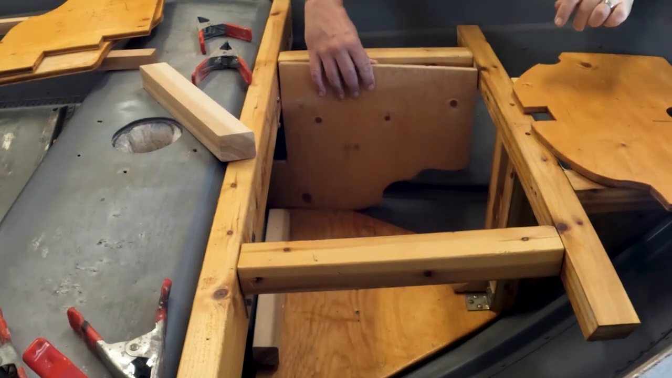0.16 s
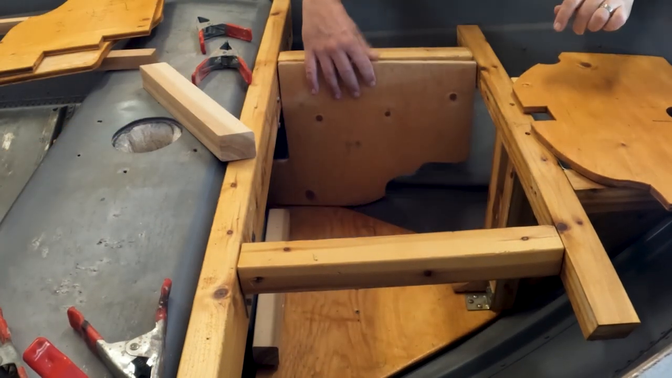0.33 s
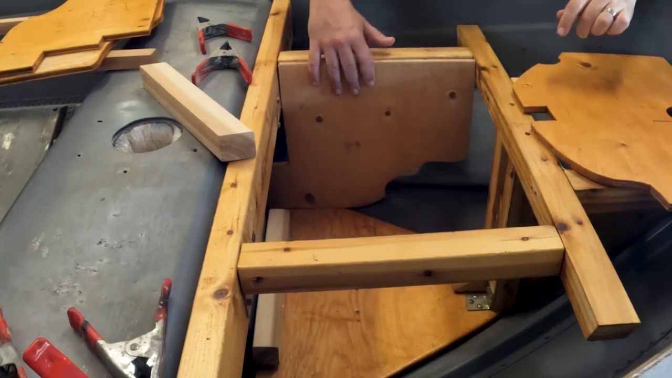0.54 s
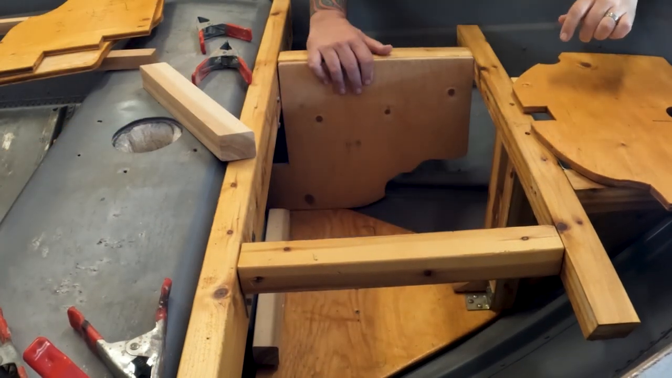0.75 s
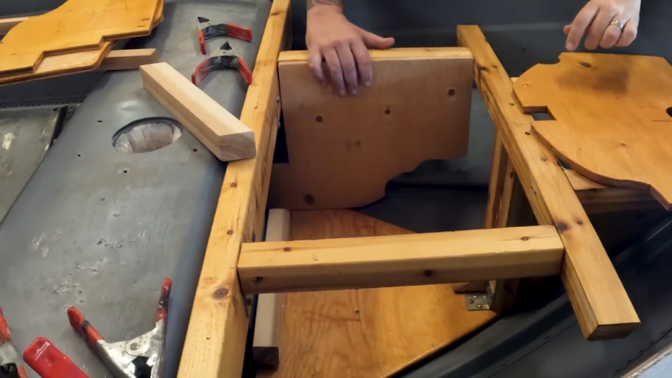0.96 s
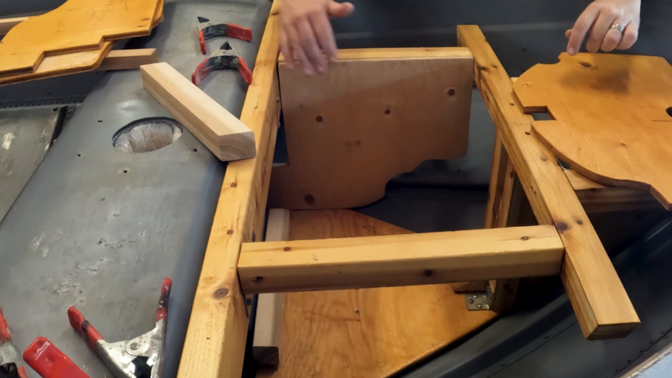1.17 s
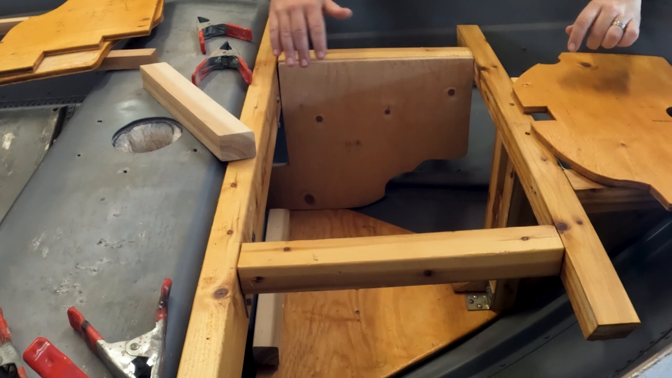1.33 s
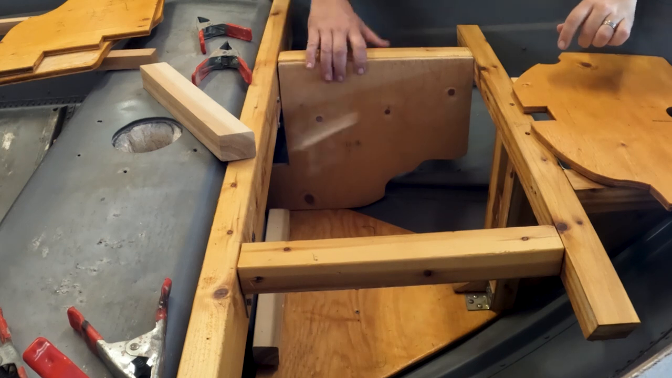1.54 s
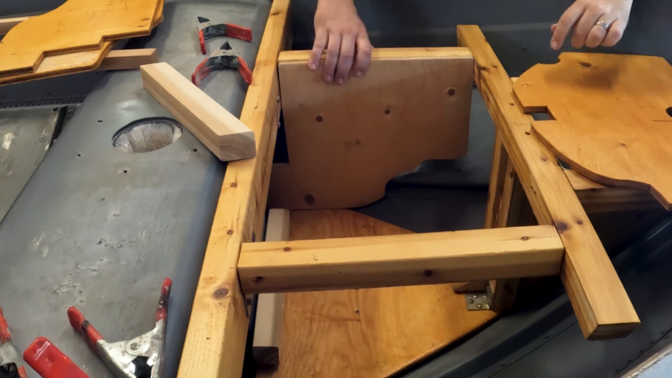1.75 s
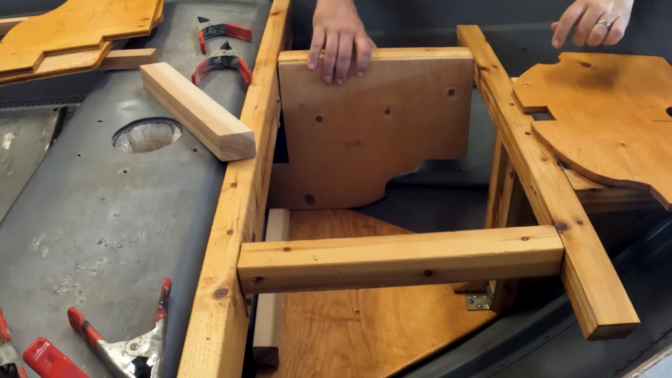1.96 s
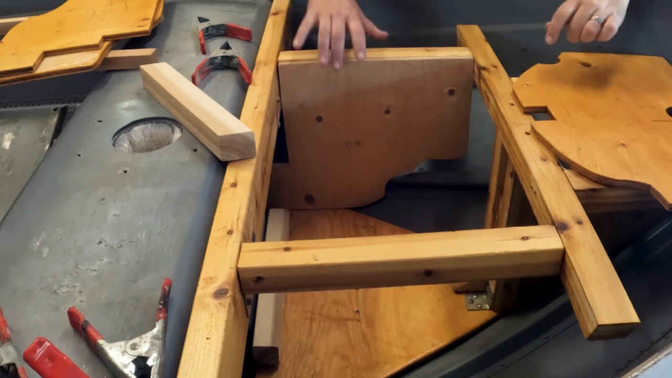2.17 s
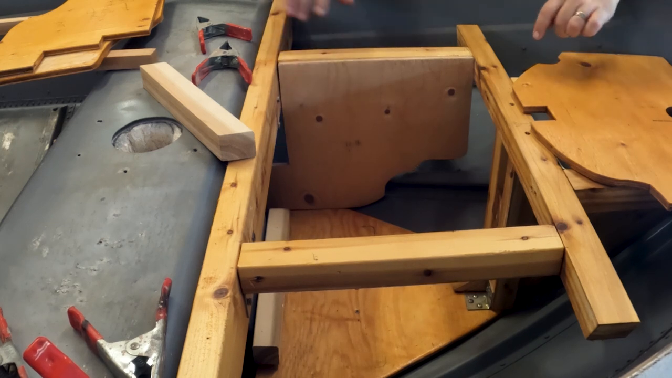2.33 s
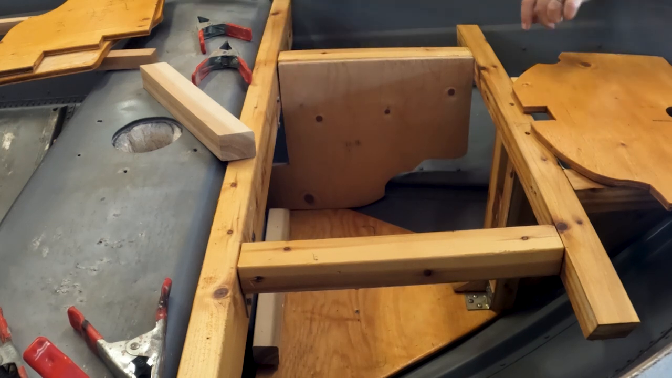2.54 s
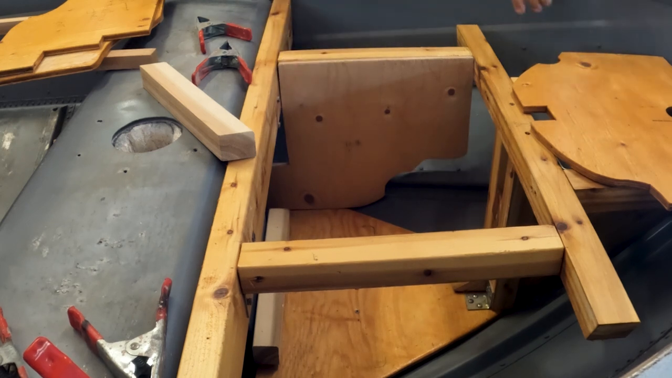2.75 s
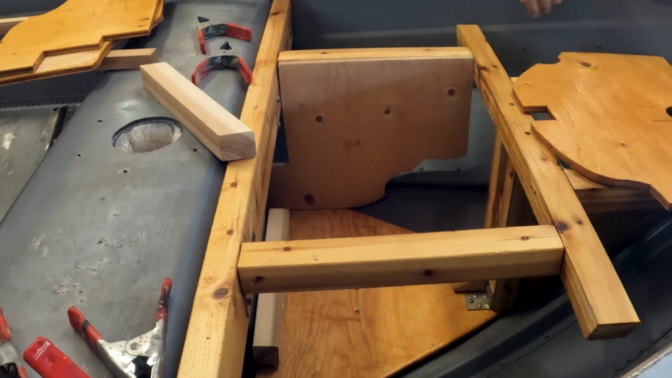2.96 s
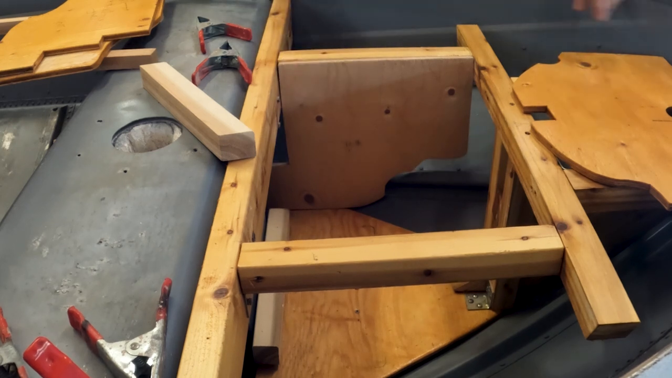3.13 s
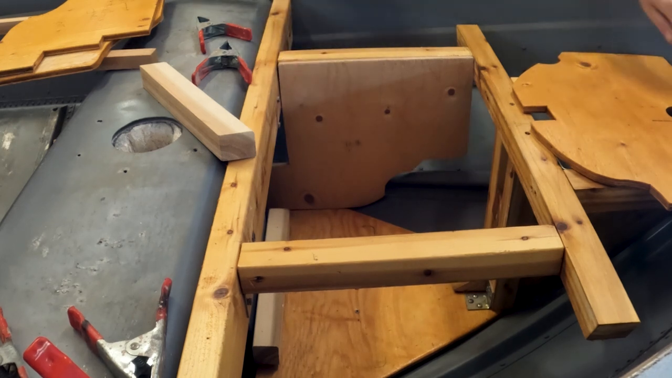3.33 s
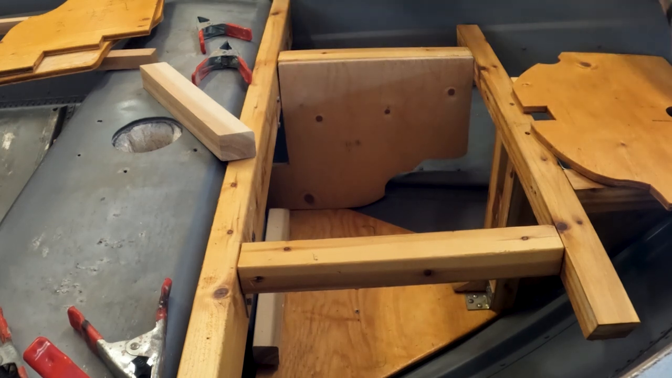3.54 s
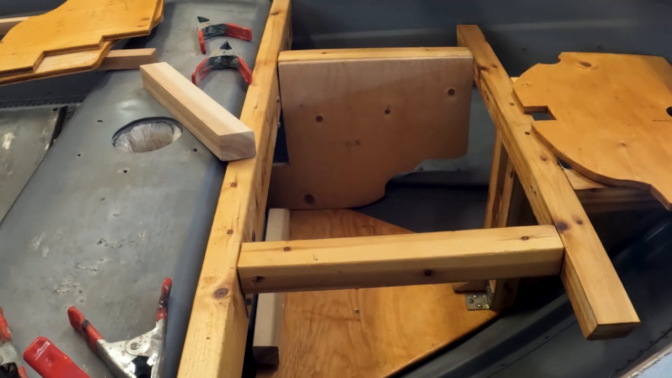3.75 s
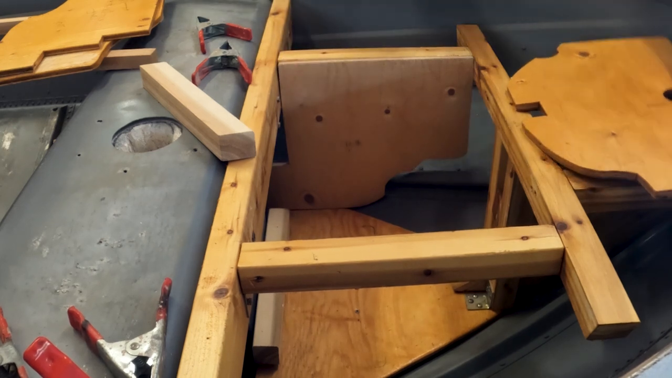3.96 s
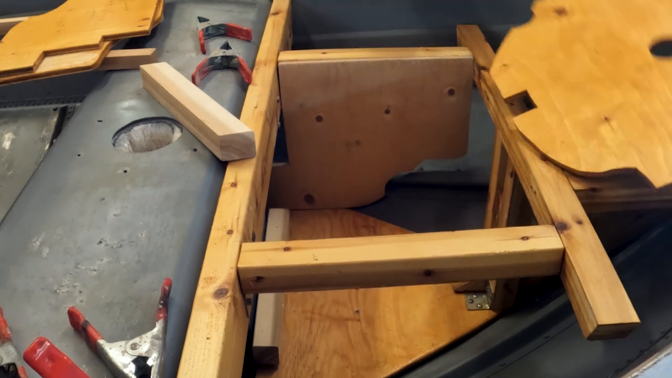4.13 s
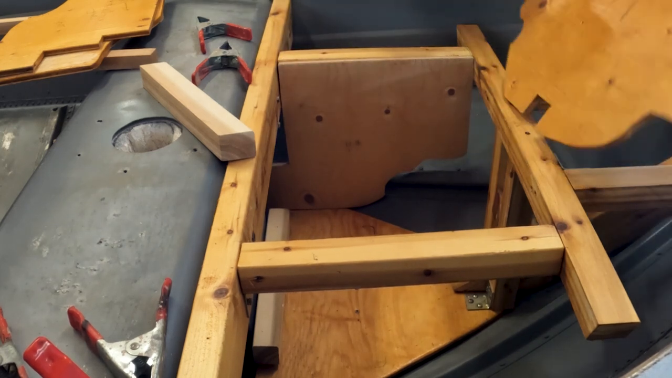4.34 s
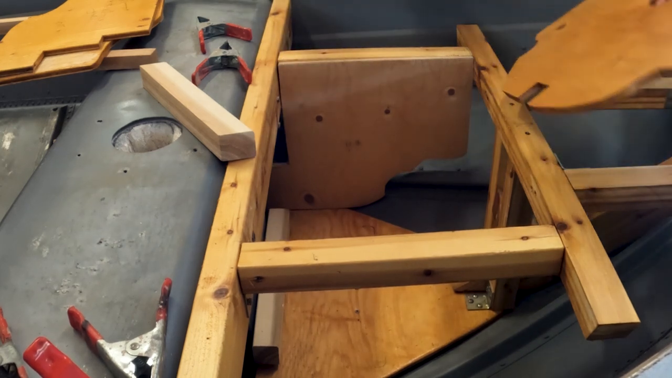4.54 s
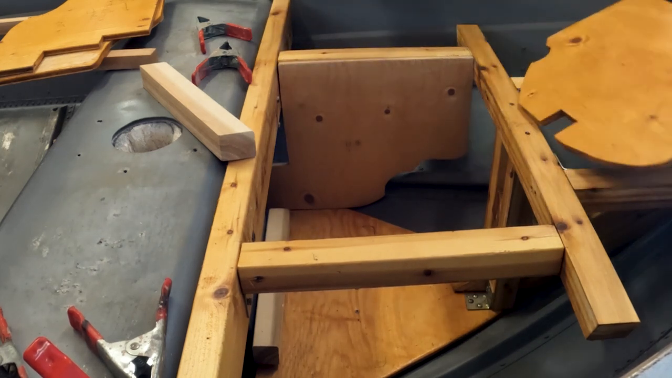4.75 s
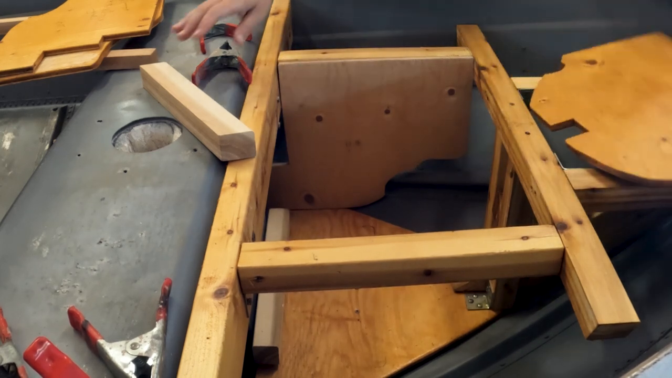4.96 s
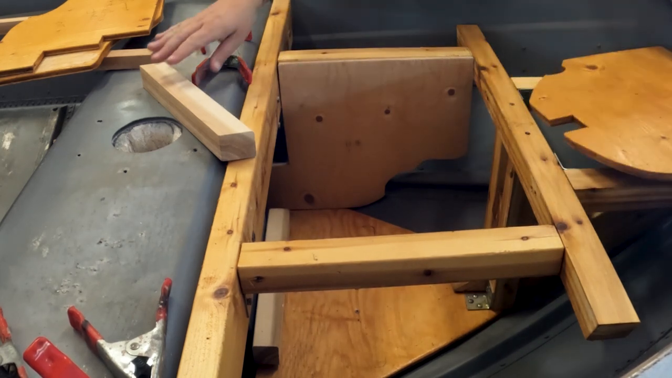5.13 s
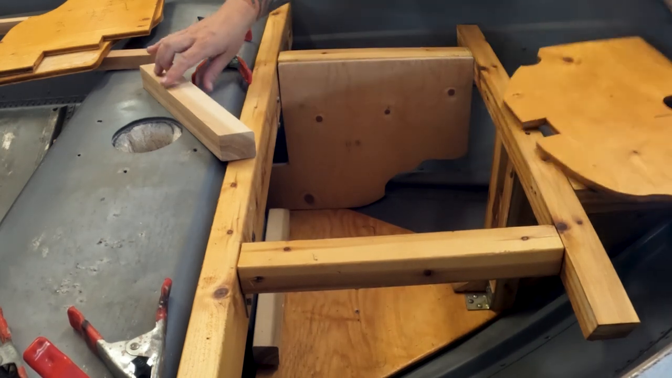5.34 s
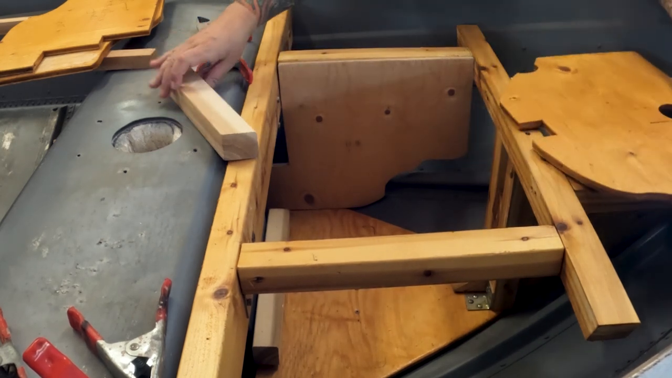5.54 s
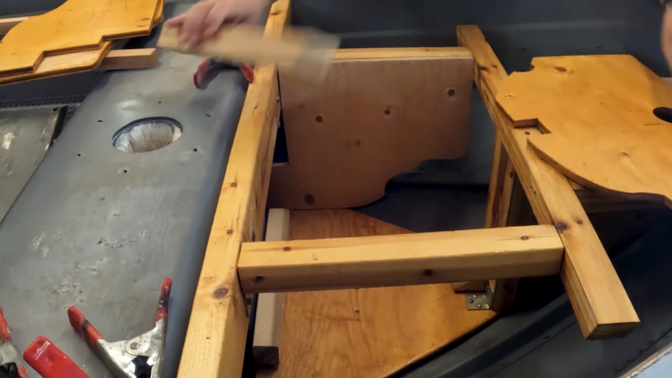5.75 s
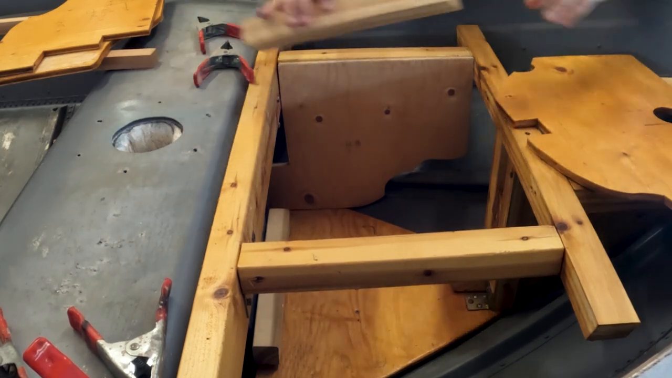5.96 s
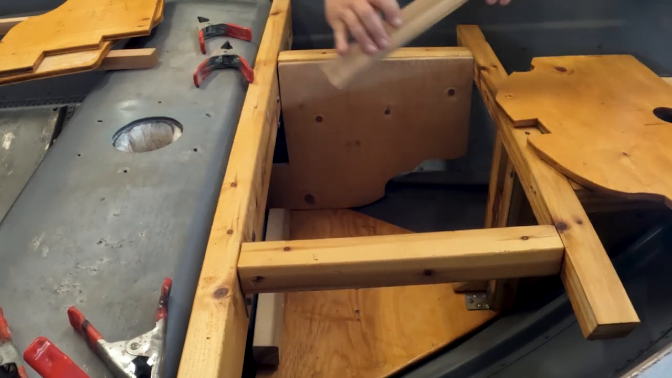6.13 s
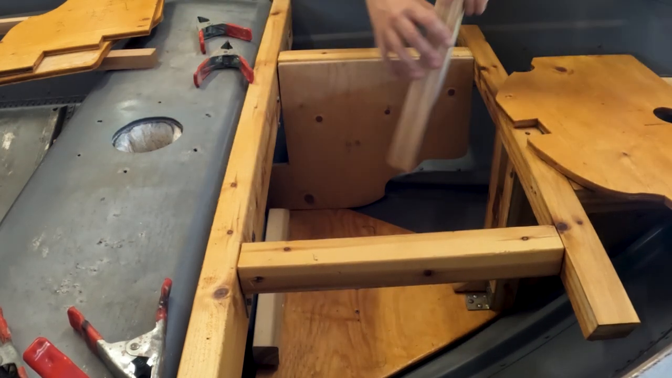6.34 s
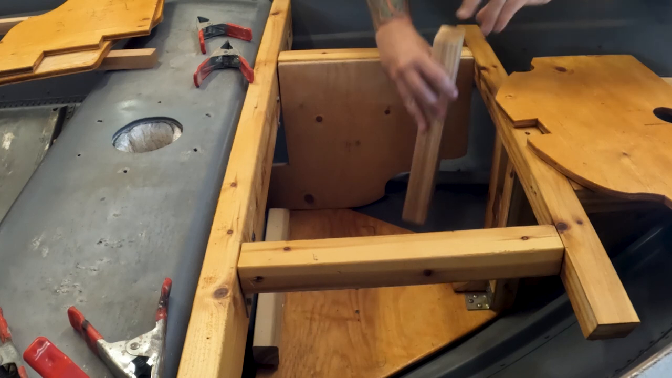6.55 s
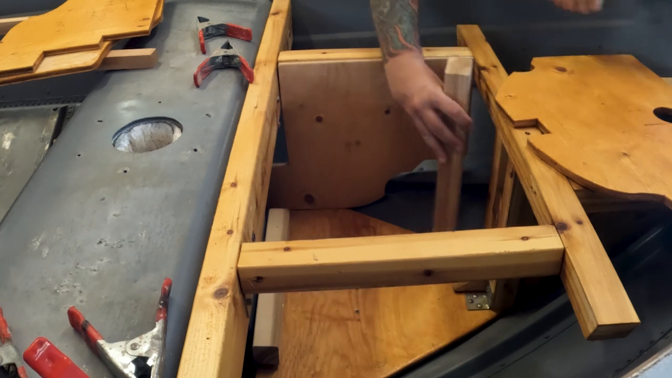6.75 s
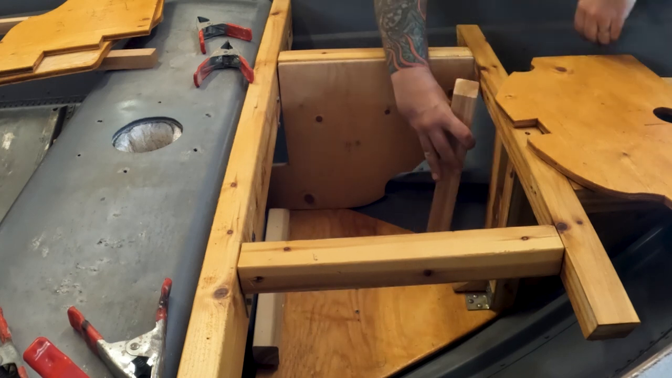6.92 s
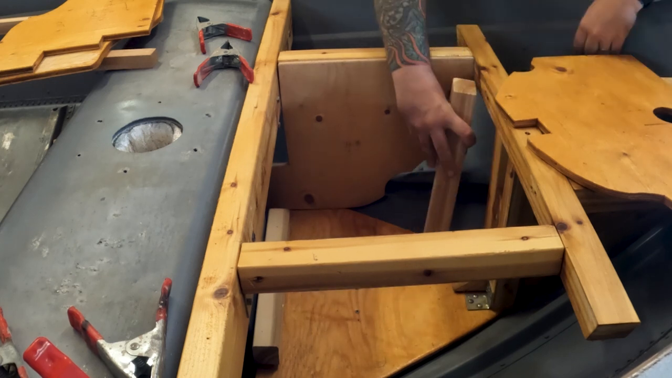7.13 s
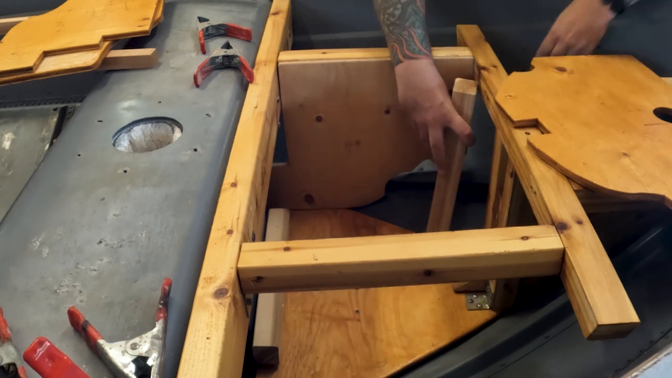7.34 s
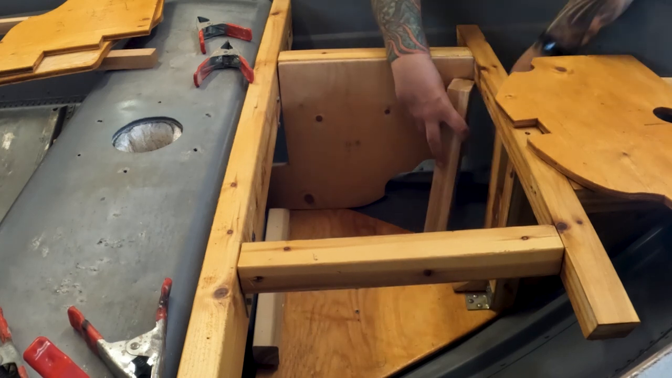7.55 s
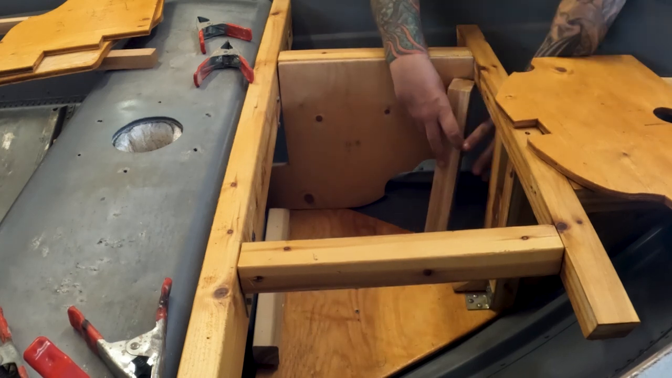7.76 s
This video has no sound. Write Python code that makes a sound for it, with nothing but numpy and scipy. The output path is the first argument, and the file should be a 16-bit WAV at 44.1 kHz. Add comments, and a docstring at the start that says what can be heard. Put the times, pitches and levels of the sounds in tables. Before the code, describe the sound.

Wooden panels knock, scrape and clatter as they are fitted in a boat hull, with low hollow thuds, a brief hum and soft workshop hiss.

```python
"""Fitting boards into a boat hull

A plywood bulkhead slides and is tapped home, a loose deck panel drags over a pine frame, clatters down and hums,
and a pine post is gripped, squeaks and is stood on the hull floor, all over a soft workshop hiss.
Blows and friction are shaped noise driving each board's own modes; hull and room carry the tail."""
import sys
import numpy as np
from scipy import signal
from scipy.fft import rfft, irfft
from scipy.io import wavfile

SR = 44100
rng = np.random.default_rng(int(sys.argv[2]) if len(sys.argv) > 2 else 0)


def wrap_up_sound(samples):
    """Save the sound to the file named by the first command line argument, as 16-bit audio."""
    columns = np.atleast_2d(samples).T
    # keep every value between -1 and 1, then stretch to whole-number steps
    tamed = np.clip(columns, -1, 1)
    steps = np.round(tamed * 32767).astype(np.int16)
    wavfile.write(sys.argv[1], SR, steps)


N = 347938


def undb(db):
    """Decibels to gain."""
    return 10 ** (np.asarray(db) / 20)


def rms(x):
    """Root mean square, kept above zero."""
    return np.sqrt(np.mean(x ** 2)) + 1e-12


def over_hz(hz, table):
    """Columns of a (Hz, ..) table, read on a log-frequency axis."""
    points_hz, *columns = np.transpose(table)
    log_hz = np.log(np.maximum(hz, 1))
    return [np.interp(log_hz, np.log(points_hz), column) for column in columns]


def over_time(table):
    """Columns of a (s, ..) table, one value a sample."""
    points_s, *columns = np.transpose(table)
    return [np.interp(np.arange(N) / SR, points_s, column) for column in columns]


def split(x, edges_hz):
    """Cut a sound into adjoining bands at the given frequencies."""
    bands = []
    for hz in edges_hz:
        low = signal.butter(5, hz, fs=SR, output="sos")
        high = signal.butter(5, hz, "high", fs=SR, output="sos")
        bands.append(signal.sosfilt(low, x))
        x = signal.sosfilt(high, x)
    return bands + [x]


def response(spectrum, modes=(), size=16384):
    """Causal impulse response of a smooth spectrum with resonances standing out of it."""
    hz = np.maximum(np.fft.rfftfreq(size, 1 / SR), 1)
    # folding the cepstrum makes the smooth part minimum-phase
    cepstrum = irfft(np.log(undb(over_hz(hz, spectrum)[0])))
    cepstrum[1:size // 2] *= 2
    cepstrum[size // 2 + 1:] = 0
    smooth = np.exp(rfft(cepstrum))
    peaks = 0
    for mode_hz, width_hz, db in modes:
        peaks = peaks + undb(db) / (1 + 1j * (hz ** 2 - mode_hz ** 2) / (hz * width_hz))
    return irfft(smooth * (1 + peaks))[:size // 2]


def workshop_air(low_cut_hz=110):
    """Steady workshop noise: a soft hiss with little bass; its level wavers by a few dB, dipping near 5.9 s and
    7.3 s."""
    # Spectrum of the hiss. Each row: frequency in Hz, relative density in dB per Hz.
    spectrum = [(24, -45.5), (40, -14), (114, -15), (181, 3.5), (267, -5.5), (350, 3.5), (446, -1),
                (504, 2), (1470, -3.5), (1830, -5), (2230, -4), (6990, -14.5), (8920, -29.5), (11100, -22),
                (13500, -58)]
    # Level of the hiss. Each row: time in seconds, rms level in dB.
    level = [(0, -53.5), (1.25, -57.5), (1.55, -51.5), (2.0, -56.5), (2.6, -54.5), (4.7, -53), (5.9, -58),
             (6.35, -57.5), (6.9, -56.5), (7.3, -59), (7.89, -56)]
    air = signal.fftconvolve(rng.standard_normal(N), response(spectrum))[:N]
    air = signal.lfilter(*signal.butter(2, low_cut_hz, "high", fs=SR), air)
    return air / rms(air) * undb(over_time(level)[0])


def wood(modes, top_db):
    """Response of one board: dense wood, its own modes, and a top octave set by how rough its edge is."""
    # Dense response of the wood. Each row: frequency in Hz, gain in dB.
    dense = [(35, -42), (60, -19.5), (110, -3), (180, 14), (400, 9.5), (700, -1), (1400, -10.5),
             (2600, -11), (4200, -13), (5600, -17), (7500, -30.5), (11000, -36.5), (13500, -69.5)]
    shelf = [(5000, 0), (10000, top_db)]  # Hz, dB
    spectrum = [(hz, db + over_hz(hz, shelf)[0]) for hz, db in dense]
    return response(spectrum, modes)


def dense_ring(t, rise_s=0.00027, build_s=0.012):
    """Countless overlapping modes die fast in the board; a longer tail builds up in hull and room."""
    # Decay. Each row: frequency in Hz, board t60 in s, hull and room t60 in s, tail in dB re the blow.
    decay = [(79, 0.022, 0.67, -11.5), (212, 0.21, 0.61, -11), (480, 0.15, 0.59, -10),
             (1220, 0.088, 0.72, -20), (3160, 0.032, 0.55, -20), (9000, 0.031, 0.43, -23.5)]
    edges_hz = 110 * 2 ** np.arange(7)
    centres_hz = np.append(edges_hz, 2 * edges_hz[-1]) / np.sqrt(2)
    noise = rng.standard_normal(len(t))
    ring = 0
    for hz, band in zip(centres_hz, split(noise, edges_hz)):
        board_t60, room_t60, tail_db = over_hz(hz, decay)
        board = undb(-60 * t / board_t60)
        room = undb(tail_db - 60 * t / room_t60) * (1 - np.exp(-t / build_s))
        ring = ring + band * np.hypot(board, room)
    return ring * (1 - np.exp(-t / rise_s))


def friction(strokes, rasp_db):
    """Gains of rumble, rasp and hiss: a stroke sets in, swells or eases, and stops; brightness trades rumble for hiss."""
    attack_s, release_s = 0.0094, 0.0084  # a hand gets a board moving, and lets it stop
    t, gains = np.arange(N) / SR, np.zeros((3, N))
    for start_s, length_s, db, bright_db, swell_db in strokes:
        before = np.maximum(start_s - t, 0) / attack_s
        after = np.maximum(t - start_s - length_s, 0) / release_s
        outside = before + after
        near = outside < 10
        progress = np.clip((t[near] - start_s) / length_s, 0, 1)
        effort = undb(db + swell_db * (progress - .5)) * np.exp(-outside[near])
        stroke = np.outer(undb([-bright_db, rasp_db, bright_db]), effort)
        gains[:, near] = np.hypot(gains[:, near], stroke)
    return gains


def slide(strokes, modes, rasp_db, slips_per_s, spread_db, patchy_db, top_db):
    """The grain of a sliding edge catches and slips in patches; each slip is a tiny blow into the same board."""
    # Edges between rumble, rasp and hiss, in Hz.
    edges_hz = [550, 1500]
    spot_s = .07
    slipping = rng.random(N) < slips_per_s / SR
    size = np.minimum(rng.exponential(size=N), 4)
    patches = np.interp(np.arange(N), np.linspace(0, N, 700), rng.uniform(-1, 1, 700))
    slips = slipping * undb(spread_db * size + patchy_db * patches) * rng.choice([-1, 1], N)
    drives = slips / rms(slips) * friction(strokes, rasp_db)
    first_s, last_s = strokes[0][0] - spot_s, strokes[-1][0] + strokes[-1][1] + spot_s
    t, hop = np.arange(SR // 2) / SR, int(spot_s * SR)
    board, out = wood(modes, top_db), np.zeros(N + SR)
    # the contact travels, so the dense modes it excites keep changing
    for start in range(max(int(first_s / spot_s), 0) * hop, min(int(last_s * SR), N), hop):
        ring = signal.fftconvolve(dense_ring(t), board)[:len(t)]
        for drive, band in zip(drives, split(ring, edges_hz)):
            rub = signal.fftconvolve(drive[start:start + hop], band / np.linalg.norm(band))
            out[start:start + len(rub)] += rub
    return out[:N]


def blow_levels(strength_db, hardness_db, thud_db, colour):
    """Thud, boom, knock, clack and tick of one blow, in dB; a harder contact lifts the treble most."""
    # Shares of the hardness that go to knock, clack and tick.
    share = (0.25, 0.87, 1.02)
    treble_db = np.array(colour) + hardness_db * np.array(share)
    return strength_db + np.array([thud_db, 0, *treble_db])


def knocks(blows, modes, colour, contact_s, push_db, top_db):
    """Every blow lands on another spot; its force and hardness set its thud, boom, knock, clack and tick."""
    # Edges between the five bands of a blow, in Hz.
    edges_hz = [130, 550, 1500, 3500]
    # Centres of those bands, in Hz.
    centres_hz = [80, 270, 900, 2300, 5200]
    level_n = int(.035 * SR)  # levels hold over the first 35 ms
    t = np.arange(SR * 3 // 4) / SR
    board, out = wood(modes, top_db), np.zeros(N + len(t))
    push = np.sin(np.pi * np.minimum(t / contact_s, 1)) ** 2  # starts the low modes together
    for start_s, strength_db, hardness_db, thud_db in blows:
        levels_db = blow_levels(strength_db, hardness_db, thud_db, colour)
        force = undb(push_db) * push / push.sum() + dense_ring(t, rise_s=contact_s)
        ring = signal.fftconvolve(force, board)[:len(t)]
        for _ in range(2):  # the bands overlap, so the colour settles in two passes
            bands = split(ring, edges_hz)
            gains_db = [db - 20 * np.log10(rms(band[:level_n])) for db, band in zip(levels_db, bands)]
            contact = response(list(zip(centres_hz, gains_db)), size=4096)
            ring = signal.fftconvolve(ring, contact)[:len(t)]
        start = max(int(start_s * SR), 0)
        out[start:start + len(t)] += ring
    return out[:N]


def pine_frame():
    """The frame rasps as the deck's edge drags over it, and a corner chatters over a beam as it is tipped up."""
    # Frame modes. Each row: frequency in Hz, width in Hz, level in dB over the dense wood response.
    modes = [(185, 51, 3), (251, 21, 11.5), (377, 14, 6.5), (600, 160, -8), (1078, 48, 7), (1448, 29, 8.5),
             (1970, 60, 1), (2185, 29, -1.5), (2930, 21, 1.5), (3600, 53, -1)]
    # Deck-edge strokes. Each row: start in s, length in s, level in dB, brightness in dB, swell in dB.
    strokes = [(3.38, 0.31, -60, 1.5, 14), (3.68, 0.097, -43.5, 0, -3.5), (3.8, 0.016, -44.5, 0.5, 14.5),
               (3.84, 0.13, -53, -0.5, 6), (3.955, 0.097, -37, -1, 11.5), (4.14, 0.35, -48, -1, -11),
               (4.32, 0.052, -41, 0, -16), (4.51, 0.081, -53, 5, 2), (4.73, .1, -54, 0, 17)]
    # Corner chatter. Each row: start in s, length in s, level in dB, brightness in dB, swell in dB.
    chatter = [(4.328, 0.054, -46, 0.5, -6)]
    drag = slide(strokes, modes, rasp_db=-6.5, slips_per_s=1100, spread_db=3.5, patchy_db=2.0, top_db=10.5)
    return drag + slide(chatter, modes, rasp_db=12, slips_per_s=600, spread_db=2.5, patchy_db=-1.5, top_db=5)


def squeaks(spread=0.0098):
    """Light rubbing as the post is gripped and turned keeps narrow, unsteady notes going."""
    # Squeaks. Each row: start in s, length in s, frequency in Hz, level at mid-squeak in dB rms.
    notes = [(6.242, 0.053, 1880, -62), (6.55, 0.079, 1860, -58), (7.43, 0.2, 1990, -58),
             (7.438, 0.27, 4370, -65)]
    t, out = np.arange(N) / SR, np.zeros(N)
    for start_s, length_s, hz, db in notes:
        band = signal.butter(1, [hz / (1 + spread), hz * (1 + spread)], "band", fs=SR)
        note = signal.lfilter(*band, rng.standard_normal(N))
        swell = np.sin(np.pi * np.clip((t - start_s) / length_s, 0, 1))
        out += undb(db) * note / rms(note) * swell
    return out


def pine_post():
    """Blows as the post is stood on the hull floor, with squeaks and fingers shifting their grip."""
    # Blows. Each row: start in s, strength in dB, contact hardness in dB, hull thud in dB over the strength.
    blows = [(7.025, -19, 4.5, -25.5), (7.04, -13, -23.5, -14), (7.089, -19.5, -19.5, -13.5),
             (7.332, -41, -9, -0.5), (7.578, -38.5, -8, -5.5), (7.646, -31.5, 7, -12.5),
             (7.655, -20, 2.5, -13.5), (7.88, -52, 18, -32)]
    # Post modes. Each row: frequency in Hz, width in Hz, level in dB over the dense wood response.
    modes = [(172, 35, 2.1), (254, 29, 5.1), (282, 66, 18.5), (328, 8, 11), (393, 21, 12.2), (455, 11, 5.3),
             (544, 11, 10.3), (714, 3.5, 1.9), (990, 16, 1.7), (1200, 52, 6), (1414, 57, 3.2),
             (1907, 110, 7.4), (2700, 20, 3.8), (3500, 24, 1.9), (4120, 180, 3.6)]
    # Colour of an average blow: knock, clack and tick in dB over its boom.
    colour = (-5, -17.5, -28.5)
    # Finger strokes. Each row: start in s, length in s, level in dB, brightness in dB, swell in dB.
    strokes = [(6.08, 0.022, -59, 3, 4), (6.29, .06, -66.5, 7.5, -2), (6.4, .045, -66, 3, -5),
               (6.49, .04, -73.5, 15, -7), (6.56, 1, -68.5, 3, -6), (7.555, 0.052, -55.5, -8, 23)]
    post = knocks(blows, modes, colour, contact_s=0.001, push_db=17.5, top_db=10) + squeaks()
    return post + slide(strokes, modes, rasp_db=-5, slips_per_s=800, spread_db=3, patchy_db=4, top_db=27)


def bulkhead_panel():
    """The plywood bulkhead rubs as it is pushed home and rings under taps."""
    # Blows. Each row: start in s, strength in dB, contact hardness in dB, hull thud in dB over the strength.
    blows = [(0, -35, -28, -2.5), (0.303, -18.5, -29.5, -14.5), (0.322, -34, 11.5, -33),
             (0.504, -18, -12, -11), (0.516, -31.5, 1, -21), (0.825, -19.5, 13.5, -8),
             (1.626, -25.5, 0, -12), (1.667, -29.5, -5.5, -15.5), (1.808, -19.5, 5.5, -11),
             (2.667, -45.5, -3, -10)]
    # Bulkhead modes. Each row: frequency in Hz, width in Hz, level in dB over the dense wood response.
    modes = [(95, 2.7, 6.5), (210, 120, 2.5), (207, 72, -15), (275.5, 20, 13.5), (353.7, 6.3, 1.5),
             (375, 31, 4.5), (600.7, 8.7, 7.5), (770, 5.8, -16), (1012, 22, 2), (1237, 115, 6.5),
             (1930, 120, 2.5), (2710, 96, -1), (4230, 30, 3.5)]
    # Colour of an average blow: knock, clack and tick in dB over its boom.
    colour = (-4.5, -16, -34)
    # Sliding strokes. Each row: start in s, length in s, level in dB, brightness in dB, swell in dB.
    strokes = [(0, .05, -46, 0, 1), (.21, 0.041, -47, 1.5, -4), (.325, 0.0082, -35.5, 9.5, -20),
               (.345, 0.097, -48.5, 1.5, -6), (.465, 0.06, -33, -3, 4), (.765, 0.059, -32.5, -5, 13.5),
               (2.675, 0.098, -49.5, -3, -1)]
    bulkhead = knocks(blows, modes, colour, contact_s=0.0006, push_db=16.5, top_db=19)
    return bulkhead + slide(strokes, modes, rasp_db=-5, slips_per_s=1500, spread_db=2.5, patchy_db=6, top_db=13)


def deck_hum(start_s, swell_s=0.079):
    """From the last bounce on, panel and frame ring freely in decaying low sines."""
    # Hum notes. Each row: frequency in Hz, level in dB, t60 in s.
    hum = [(255, -8.5, 0.49), (351, -15, 0.38), (350, -31, 0.33), (454, -40, 0.68)]
    t = np.maximum(np.arange(N) / SR - start_s, 0)
    notes = sum(undb(db - 60 * t / t60) * np.sin(2 * np.pi * hz * t) for hz, db, t60 in hum)
    return notes * (1 - np.exp(-t / swell_s))


def deck_panel():
    """The loose deck panel clatters as it is set down, rubbing between bounces, then hums on."""
    # Blows. Each row: start in s, strength in dB, contact hardness in dB, hull thud in dB over the strength.
    blows = [(3.675, -53, 16, -5), (3.832, -38, -26, -1.5), (3.873, -40, -17, 3.5),
             (4.043, -29.5, 11, -10.5), (4.095, -36.5, -30, -2.5), (4.468, -58, 25, 1),
             (4.834, -19, 12.5, -18), (4.909, -22.5, -3.5, -11.5), (5.004, -30.5, 12.5, -35),
             (5.027, -18, -2.5, -11.5), (5.045, -23.5, 0.5, -17), (5.079, -19, -5, -25.5),
             (5.11, -19, 18.5, -6), (5.172, -18, 4.5, -10), (5.358, -23.5, 4.5, -34), (5.372, -23.5, 8, -9),
             (5.397, -18, 2.5, -22.5), (5.429, -28, 8, -1), (5.447, -23, 3.5, -30), (5.512, -27, 9, -13),
             (5.544, -17.5, -1.5, -25), (5.56, -26.5, -27, -3.5), (5.616, -35.5, 9.5, -7),
             (5.711, -15.5, 0.5, -11.5), (5.738, -20, -2, -21), (5.771, -17.5, -2, -17.5),
             (5.797, -19.5, -5.5, -18.5)]
    # Deck modes. Each row: frequency in Hz, width in Hz, level in dB over the dense wood response.
    modes = [(96.7, 3.6, 0.77), (168.8, 9.6, 0.77), (244.5, 7.5, 1.7), (279, 22, 2.5), (403, 61, 7.5),
             (474, 5.5, 11.7), (628.7, 8.8, 15.8), (692, 106, 8.6), (1074, 30, 11.5), (1170, 143, 6.1),
             (1540, 26, 2.1), (1682, 19, 1.7), (2450, 26, 1.4), (2900, 13, 3), (3650, 6.2, 2.7),
             (3860, 73, 1.7), (4930, 21, 1.7), (4990, 81, 1.9)]
    # Colour of an average blow: knock, clack and tick in dB over its boom.
    colour = (-5.5, -15.5, -26.5)
    # Sliding strokes. Each row: start in s, length in s, level in dB, brightness in dB, swell in dB.
    strokes = [(4.86, 0.17, -35.5, -8, 13), (5.03, .19, -33, -7.5, 5), (5.22, 0.07, -38, -3, -3),
               (5.365, .1, -36, -4.5, -10), (5.535, 0.065, -30.5, -5.5, -7), (5.575, 0.04, -43, 4, 5),
               (5.64, 0.051, -42.5, 1.5, 2.5), (5.72, 0.084, -31, -8, -4)]
    deck = knocks(blows, modes, colour, contact_s=0.00079, push_db=17.5, top_db=-3.5)
    deck += deck_hum(start_s=blows[-1][0])
    return deck + slide(strokes, modes, rasp_db=-3.0, slips_per_s=990, spread_db=2.0, patchy_db=11.0, top_db=9)


def scene():
    """The workshop air, the frame and the three boards, as one channel."""
    return (workshop_air() + pine_frame() + pine_post() + bulkhead_panel() + deck_panel())[None]


def record(dry, notch_hz=9200, notch_q=2.96):
    """The microphone port cancels a treble band; the loudest peaks are rounded and the top is cut steeply."""
    top_hz, ceiling = 13700, .88
    coloured = signal.lfilter(*signal.iirnotch(notch_hz, notch_q, fs=SR), dry)
    rounded = coloured / (1 + (coloured / ceiling) ** 6) ** (1 / 6)
    return signal.sosfilt(signal.ellip(8, .2, 70, top_hz, fs=SR, output="sos"), rounded)


dry = scene()
out = record(dry)
wrap_up_sound(out)
```